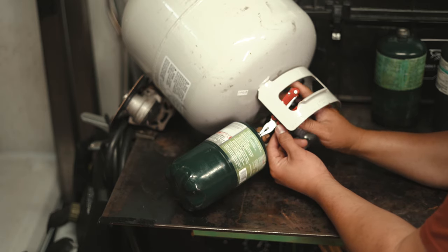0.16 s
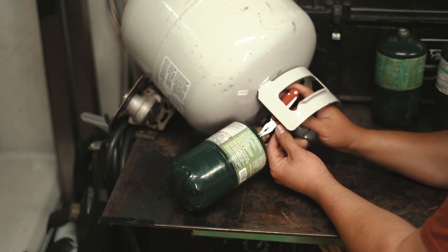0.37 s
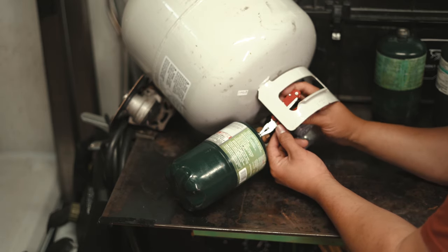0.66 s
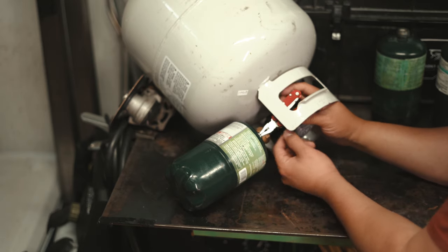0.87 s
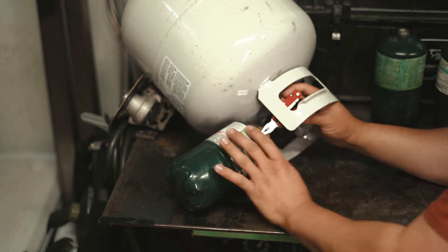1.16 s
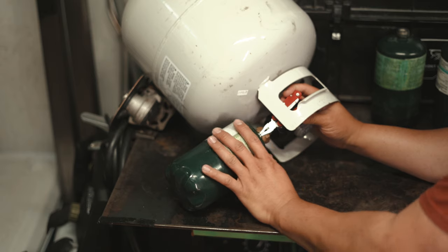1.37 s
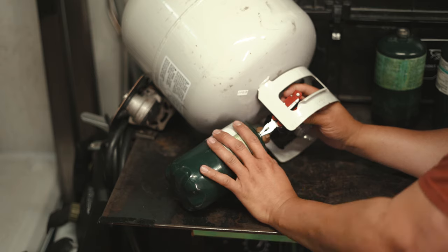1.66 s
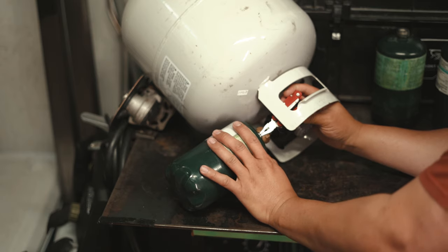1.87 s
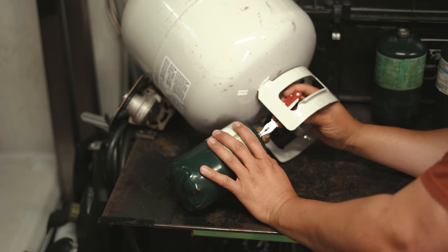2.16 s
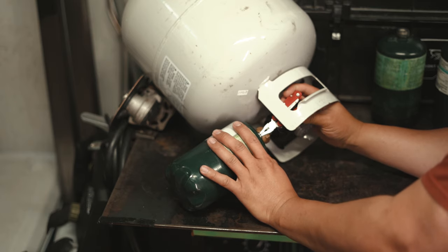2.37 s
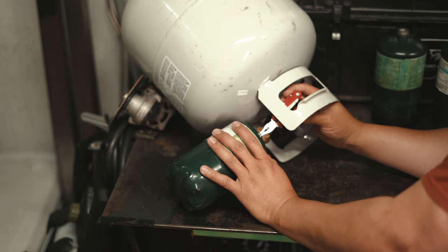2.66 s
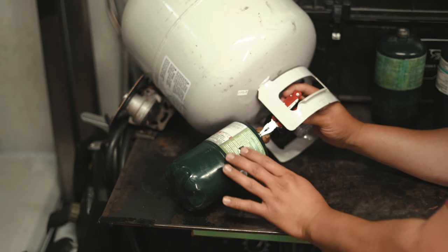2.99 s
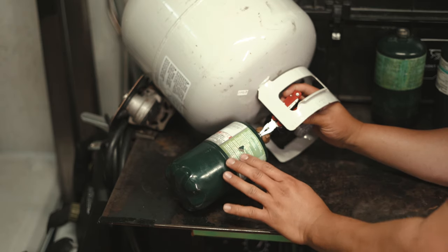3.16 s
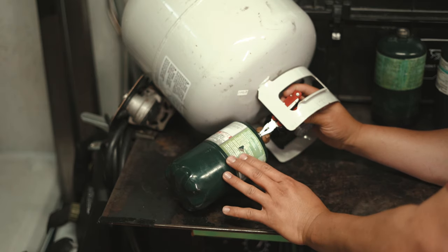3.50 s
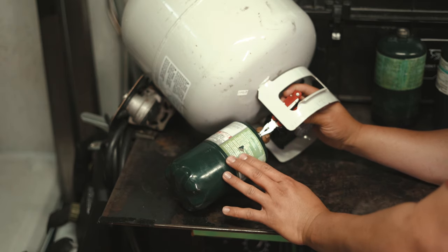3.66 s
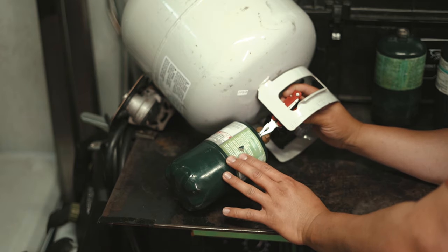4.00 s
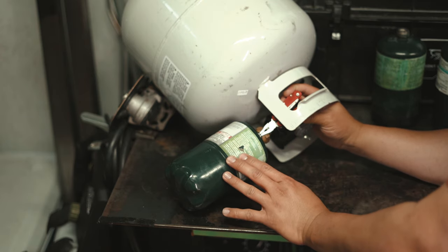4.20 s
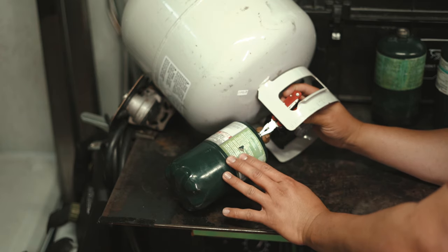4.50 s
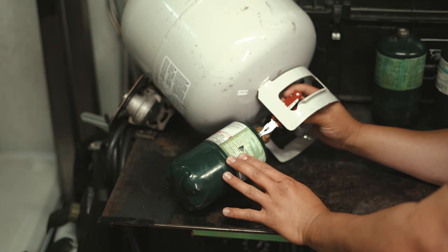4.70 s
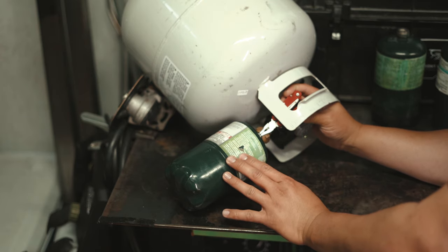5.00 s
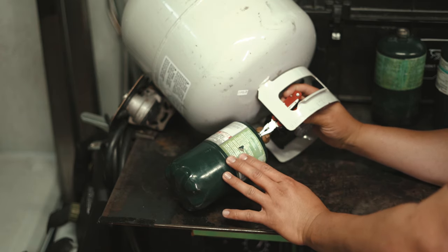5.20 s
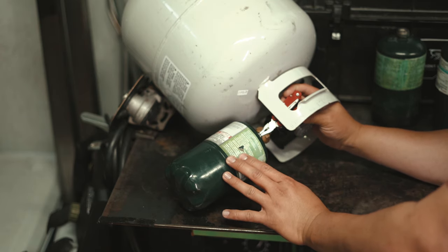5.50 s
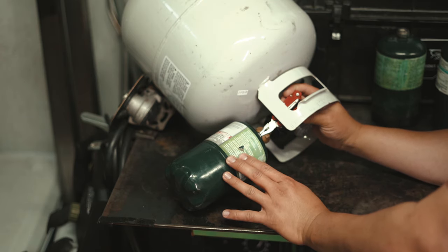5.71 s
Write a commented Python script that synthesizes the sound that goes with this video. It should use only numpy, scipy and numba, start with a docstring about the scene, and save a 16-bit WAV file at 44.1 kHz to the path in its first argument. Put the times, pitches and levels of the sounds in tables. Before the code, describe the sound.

A steady low fan rumble with faint room hiss fills a workshop, picked up closely by one microphone, identical in both channels. From 0 to 1.6 s hands make short, airy rubs on metal and small hard clicks, sharpest near 0.5, 1.0 and 1.2 s, with slight steel ringing; a very faint breathy tone and low bench rumble come in. At 1.7 s a falling breathy whistle cracks open into a loud, bright gas jet until 2.4 s. It drops to a thin leak that spits and crackles wetly, densest at 2.65-2.95 s. At 3.0 s there is a click, a rub and a soft ringing ping. More abrupt jets come at about 3.55-3.9, 4.15-4.7, 4.9-5.3 and 5.55-5.9 s, the last three swelling into rougher full blasts. Thin hissing leaks fill the gaps. The rumble ducks under each surge, held to a similar loudness, while a faint hollow hum grows.

```python
"""Filling a propane cylinder

A small cylinder is filled from a big tank on a workshop bench, over the steady rumble of a fan.
Hands rub and click at the fitting, made of short noise strokes, noise bursts and decaying sines.
Then gas vents as the valve is worked: filtered noise blends from a thin spitting leak to a loud jet
or a full blast, with a whistle as the seat cracks open and a hum that grows as the cylinder fills.
A limiter holds the jet down, so the rumble ducks under every surge.
"""
import sys
import numpy as np
from scipy import signal
from scipy.fft import rfft, irfft
from scipy.io import wavfile
from scipy.ndimage import uniform_filter1d
from numba import njit

SR = 44100
rng = np.random.default_rng(int(sys.argv[2]) if len(sys.argv) > 2 else 0)


def bounce(signal):
    """Save signal as a 16-bit WAV file at the path given by the first command-line argument."""
    frames = np.transpose(np.atleast_2d(signal))
    limited = np.clip(frames, -1, 1)
    pcm = np.round(limited * 32767).astype(np.int16)
    wavfile.write(sys.argv[1], SR, pcm)


N = 257984
TIME = np.arange(N) / SR
HZ = np.maximum(np.arange(N // 2 + 1) * SR / N, 1)  # frequency of each spectrum bin
TOP_HZ = 15750  # the final treble cut

# Spectrum of the room noise. Each row: frequency in Hz, relative level in dB.
ROOM_COLOUR = [(20, -34), (40, -2), (75, -0.5), (150, -7.5), (200, -8.5), (300, -16.5), (400, -16),
               (900, -15), (1500, -18.5), (2500, -26), (5000, -31.5), (10000, -32.5), (15000, -26)]
# Fan and room resonances. Each row: centre in Hz, width in Hz, lift in dB.
FAN_RESONANCES = [(76, 5.8, 1.5), (106.6, 11, 9), (148.8, 10, 10.5), (367.4, 26, 6.5), (664.51, 22, 8)]

# Hands slide on the metal. Each row: middle in seconds, reach either side (down 17 dB) in seconds,
# level in dB, centre in Hz.
RUBS = [(.005, 0.056, -41, 4440), (0.138, 0.043, -46.5, 4000), (0.434, 0.02239, -43, 4500),
        (0.603, 0.018, -36, 6760), (0.627, 0.12, -44.5, 6000), (0.927, 0.054, -33, 7450),
        (1.25, 0.08754, -40, 10000), (1.339, 0.054, -37.5, 8609), (1.437, 0.089, -38, 7350),
        (1.572, .02, -44.5, 3980), (3.014, 0.076, -26, 10000)]
# Metal clicks at the fitting. Each row: start in seconds, approximate peak of the contact in dB,
# centre in Hz, nominal width in Hz, ring relative to the contact in dB.
CLICKS = [(0.421, -25.5, 4000, 4000, -22), (.525, -8, 11300, 14260, -35), (0.8136, -19, 5100, 7000, -22.5),
          (.999, -19, 4474, 7000, -30), (1.0049, -5.5, 6400, 2681, -25.5), (1.147, -26, 4500, 6000, -26),
          (1.194, -6, 6700, 11000, -27), (1.419, -21, 9000, 6000, -46), (3.006, -13, 9000, 10000, -24)]
# Ring of the steel cylinder. Each row: frequency in Hz, relative level in dB, 60 dB decay in seconds.
STEEL_MODES = [(850, -9.5, 0.17), (1881.1, -3.5, 0.32), (1976, -8, .15), (3400, 4, 0.057),
               (3715.3, -3.5, 0.0967), (6120, -5, 0.0668), (6834, -5, 0.14), (7250, 3, 0.06)]

# A faint sing at the tank valve; rise and fall are seconds per 20 dB.
SING_S, SING_RISE_S, SING_FALL_S, SING_DB = 1.3, 0.6, 0.8, -47.5
# The bench rumbles as a hand bears down on the cylinder.
LEAN_FROM_S, LEAN_TO_S, LEAN_HZ, LEAN_DB = 1.32, 1.78, 74.5, -40.5

# The seat cracks open with a falling breathy whistle.
CRACK_S, CRACK_LENGTH_S, CRACK_DB = 1.696, 0.06, -34.5
# Where the two whistle bands settle: lower and upper frequency in Hz.
CRACK_HZ = (5800, 9300)
CRACK_SHARP, CRACK_GLIDE_S = 0.15, 0.022  # share by which they start higher; time constant of the glide

# The valve is pressed open. Each row: open in seconds, let go in seconds, jet on opening in dB,
# rise in dB per second, fall in dB per second.
SURGES = [(1.784, 2.379, -1, 703, 305), (3.563, 3.879, -1.5, 230, 382), (4.153, 4.667, -1.5, 560, 125),
          (4.915, 5.266, 1, 276, 400), (5.537, 5.9, 2, 377, 400)]
ARCH_DB, ARCH_POWER = 5.5, 0.82  # the flow swells mid-press; a low power flattens the arch
SAG_DB = 4.5  # the pressure sags over the length of a press
TAIL_DB, TAIL_DB_PER_S = -19, 110  # the fitting empties: level below the end of the press, decay rate
# The leak in the pauses between presses. Each row: level in dB just after letting go,
# level in dB just before the next press.
LEAKS = [(-26, -22.5), (-28.5, -20.5), (-24.5, -26), (-26.5, -22)]
CREEP_POWER = 4.1  # the leak moves to its next level late in each pause, mostly upward
SEEP_DB = -11.5  # a little of the jet always sounds in the leak
# The valve goes fully open inside a surge. Each row: middle in seconds, half length in seconds,
# extra flow in dB.
BLASTS = [(4.293, 0.1, 6), (5.091, 0.094, 2), (5.682, 0.089, 4)]
# Colour of the turbulence. Each row: frequency in Hz, relative levels of leak, jet and blast in dB.
GAS_COLOUR = [(195, -6.5, -36, -33.5), (418.8, -7, -23, -22), (820.3, -10, -17.5, -16.5),
              (1483.4, -7.5, -20, -14.5), (3180, -4, -9.5, -10.5), (3800, -12.5, -2, -7.5),
              (4800, -2.5, -3.5, -15), (6840, -5, -0.5, -5.5), (8680, 3, -8, -10), (9800, -13, -9.5, -12),
              (11700, -10, -9.5, -13.5), (12740, -8, -11, -23), (14550, 5.5, 0, -3), (16200, -6, -6, -5.5)]
# Resonances of valve and cylinder. Each row: centre in Hz, width in Hz, lift in dB.
CAVITIES = [(1270, 140, 2), (1879, 70, 4.5), (3585, 37, 7), (3861.9, 24, 4.5), (4315, 6.1, 9.5),
            (4495, 140, 5), (4440, 280, 2), (4787, 61, 8.5), (4840, 89, 8.5), (5011, 136, 12.5),
            (5126, 77, 6.5), (5465.7, 220, 9.5), (5865, 240, 9.5), (6120, 152, 8.5), (6776, 34, 10.5),
            (8630, 110, 2), (9214, 222.0, 2), (12090, 148.0, 9.5), (9343, 150, 1.5), (11000, 110, 4),
            (13080, 120, 10), (14324, 250, 3.5)]
# Peaks and notches of the nearly closed passage. Each row: centre in Hz, width in Hz, lift in dB.
THROAT = [(1280, 270, 5), (4250, 109, -10), (4820, 307.7, -14), (5430, 120, 14), (6180, 285, 0.5),
          (7300, 220, -4), (8450, 88.7, -2), (7670, 59, -2.5), (8820, 250, -26), (9000, 115, 7),
          (12650, 120, 19), (13370, 150, -2), (13670, 85, -3.5), (15190, 175, 3), (14900, 280, -6),
          (14800, 200, 6.5)]
# The passage before the grip shifts. Each row: centre in Hz, width in Hz, lift in dB.
FIRST_GRIP = [(3670, 350, -1.5), (4400, 300, 5.5), (4840, 388.5, -6.5), (5600, 220, -2.5), (6350, 260, 6),
              (6780, 700, -4.5), (9380, 270, 7), (12800, 1424, -1), (16000, 790, -10)]
# The passage in the later surges. Each row: centre in Hz, width in Hz, lift in dB.
LATER_GRIP = [(4072.4, 230, 3), (5430, 220, -5), (7840, 510, 3.5), (8710, 300, -7), (8813.5, 210, 7),
              (13300, 300, 6.5), (15200, 300, -14)]
GRIP_SHIFT_S = 2.6

# Spells when liquid reaches the leak. Each row: start in seconds, end in seconds, strength in dB,
# rise in seconds per 20 dB, fall in seconds per 20 dB.
WET_SPELLS = [(2.424, 2.443, 2, 0.55, 0.2), (2.637, 2.9, 1.5, 0.2, 0.12)]
# The largest drops spit through the leak. Each row: start in seconds, approximate peak in dB.
SPITS = [(2.444, -4.5), (2.646, -8), (2.661, -6), (2.684, -8), (2.706, -7), (2.729, -3.5), (2.754, -5),
         (2.850, -3.5), (2.878, -10), (2.921, -9), (2.956, -9)]
# Levels ahead of the wet-spell gain: low sputter, extra hiss of the boiling liquid, small drops (peak).
SPUTTER_DB, WET_JET_DB, DROPLET_DB = -35, -29.5, -17
DROPLETS_PER_S = 37

# A finger sets the cylinder wall singing. The row: peak in seconds, reach of the swell (from 17 dB
# down) in seconds, frequency in Hz, level in dB.
WALL_PING = (3.035, .04, 1868, -35)
# The gas inside the cylinder hums as it fills. Each row: frequency in Hz, width in Hz, relative level in dB.
HOLLOW_MODES = [(366, 12, -2.5), (1235, 40, -1), (1288.6, 40, -5)]
HUM_FULL_S, HUM_RISE_S, HUM_DB = 5.13, 1.0, -38  # the rise is seconds per 20 dB


def undb(db):
    """Decibels to gain."""
    return 10 ** (np.asarray(db) / 20)


def unit(x):
    """Scale to rms 1."""
    return x / np.sqrt(np.mean(x ** 2))


def slope(hz, db):
    """Spectrum in dB drawn through a few points, straight over log frequency."""
    return np.interp(np.log(HZ), np.log(hz), db)


def bumps(table):
    """Resonances as bell-shaped lifts or dips in dB."""
    return sum(db / (1 + (2 * (HZ - hz) / width) ** 2) for hz, width, db in table)


def band(hz, width):
    """One broad resonance in dB, 0 at its centre."""
    return -10 * np.log10(1 + ((HZ ** 2 - hz ** 2) / (HZ * width)) ** 2)


def colour(x, db):
    """Filter with the given dB response, made minimum-phase by folding its cepstrum."""
    cepstrum = irfft(np.log(undb(db)), N)
    cepstrum[1:N // 2] *= 2
    cepstrum[N // 2 + 1:] = 0
    response = np.exp(rfft(cepstrum))
    return irfft(rfft(x) * response, N)


def walk(rate):
    """Smooth random wander of rms 1: levels held for 1 / rate seconds, then averaged twice."""
    hold = max(int(SR / rate), 1)
    steps = np.repeat(rng.standard_normal(N // hold + 1), hold)
    smooth = uniform_filter1d(uniform_filter1d(steps, hold), hold)
    return unit(smooth[:N])


def fade(s, t60):
    """Exponential decay that starts at time s and loses 60 dB in t60 seconds."""
    return (TIME >= s) * undb(-60 * np.clip((TIME - s) / t60, 0, 4))


def swell(start, end, rise, fall):
    """Gain 1 from start to end; rise and fall are the seconds that each 20 dB takes on either side."""
    before = np.maximum(start - TIME, 0) / rise
    after = np.maximum(TIME - end, 0) / fall
    return 10 ** -np.minimum(before + after, 12)


def turbulence(db, grain_db, grain_rate):
    """Noise that comes in quick eddies, through a filter."""
    eddies = rng.standard_normal(N) * undb(grain_db * walk(grain_rate))
    return unit(colour(eddies, db))


def snap(s, db, t60, tail_db, tail_t60):
    """A very short burst and its scatter off bench and tank; peak near 1."""
    push = fade(s, t60)
    push_rms = np.sqrt(np.mean(push ** 2))
    burst = unit(colour(rng.standard_normal(N) * push, db)) * push_rms / 2
    tail = unit(colour(rng.standard_normal(N), db)) * fade(s, tail_t60)
    return burst + undb(tail_db) * tail


def room():
    """Steady fan rumble with resonant peaks and a faint hiss above it."""
    room_db = slope(*np.transpose(ROOM_COLOUR)) + bumps(FAN_RESONANCES)
    return undb(-36) * turbulence(room_db, grain_db=-1.37, grain_rate=12)


def rubs():
    """Skin drags over the metal in short strokes that catch and slip."""
    out = 0
    for s, reach, db, hz in RUBS:
        stroke = np.exp(-2 * ((TIME - s) / reach) ** 2)
        catch = undb(2.5 * walk(70))
        scrape = turbulence(band(hz, 1.8 * hz), grain_db=1.0, grain_rate=760)
        out = out + undb(db) * stroke * catch * scrape
    return out


def clicks():
    """Hard little contacts, each of which sets the modes of the steel cylinder ringing."""
    out = 0
    for s, db, hz, width, ring_db in CLICKS:
        ring = 0
        for mode_hz, mode_db, t60 in STEEL_MODES:
            ring = ring + undb(mode_db) * fade(s, t60) * np.sin(2 * np.pi * mode_hz * (TIME - s))
        contact_db = 2 * band(hz, width)  # doubled for steeper skirts
        contact = snap(s, contact_db, t60=0.005, tail_db=-25, tail_t60=0.15)
        out = out + undb(db) * (contact + undb(ring_db) * ring)
    return out


def sing():
    """A thin breathy tone at the tank valve: narrow-band noise that swells and fades."""
    tone = turbulence(band(2840, 170), grain_db=1.2, grain_rate=40)
    return tone * undb(SING_DB) * swell(SING_S, SING_S, SING_RISE_S, SING_FALL_S)


def lean():
    """A low rumble of the bench under the weight of the hand."""
    rumble = turbulence(2 * band(LEAN_HZ, 84), grain_db=1.5, grain_rate=22)
    return rumble * undb(LEAN_DB) * swell(LEAN_FROM_S, LEAN_TO_S, rise=0.25, fall=0.1)


def crack():
    """Two breathy bands slide down in a first puff as the gap at the seat widens."""
    glide = 1 + CRACK_SHARP * np.exp(-np.maximum(TIME - CRACK_S, 0) / CRACK_GLIDE_S)
    whistle = 0
    for hz in CRACK_HZ:
        phase = 2 * np.pi * np.cumsum(hz * glide) / SR
        whistle = whistle + walk(1700) * np.sin(phase)  # the random level makes the tone a noise band
    puff = turbulence(band(7960, 5000), grain_db=0, grain_rate=500)
    breath = unit(unit(whistle) + undb(-6) * puff)
    return breath * undb(CRACK_DB) * swell(CRACK_S, CRACK_S + CRACK_LENGTH_S, rise=0.01, fall=0.02)


def surges():
    """Gain of the jet: each press opens, arches, sags and closes, and the fitting empties after it."""
    jet = 0
    for start, end, db, rise, fall in SURGES:
        early = np.maximum(start - TIME, 0)
        late = np.maximum(TIME - end, 0)
        through = np.clip((TIME - start) / (end - start), 0, 1)
        arch_db = ARCH_DB * np.abs(np.sin(np.pi * through)) ** ARCH_POWER
        held_db = db + arch_db - SAG_DB * through
        closing_db = np.maximum(-fall * late, TAIL_DB - TAIL_DB_PER_S * late)
        jet = jet + undb(held_db - rise * early + closing_db)
    return jet


def leaking():
    """Gain of the leak: it starts with the first press and moves late in every pause to its next level."""
    starts, ends, _, rises, _ = np.transpose(SURGES)
    edges = np.column_stack([ends[:-1], starts[1:]]).ravel()  # start and end of each pause
    creep = np.interp(TIME, edges, np.arange(len(edges)) % 2) ** CREEP_POWER
    after_db, before_db = (np.interp(TIME, edges, np.repeat(db, 2)) for db in np.transpose(LEAKS))
    leak_db = after_db + creep * (before_db - after_db)
    return undb(leak_db - rises[0] * np.maximum(starts[0] - TIME, 0))


def wetness():
    """How much liquid is in the leak, as a gain."""
    return sum(undb(db) * swell(start, end, rise, fall) for start, end, db, rise, fall in WET_SPELLS)


def valve():
    """Gains of leak and jet, and the share of the jet that is a full blast."""
    jet, leak, share = surges(), leaking(), 0
    for s, half_length, db in BLASTS:
        wide = np.exp(-((TIME - s) / half_length) ** 4)  # flat-topped opening
        jet = jet * undb(db * wide)
        share = share + wide
    jet = jet + undb(SEEP_DB) * leak + undb(WET_JET_DB) * wetness()
    return leak, jet, np.minimum(share, 1)


def gas():
    """The opening blends leak, jet and blast; each rings the cavities it passes, and the flow flutters."""
    leak_gain, jet_gain, share = valve()
    hz, *shapes = np.transpose(GAS_COLOUR)
    leak_db, jet_db, blast_db = (slope(hz, shape) for shape in shapes)
    first_db = bumps(CAVITIES + FIRST_GRIP)
    later_db = bumps(CAVITIES + LATER_GRIP)
    leak = turbulence(leak_db + bumps(THROAT), grain_db=0.2, grain_rate=760)
    first = turbulence(jet_db + first_db, grain_db=0.7, grain_rate=730)
    later = turbulence(jet_db + later_db, grain_db=1.03, grain_rate=800)
    blast = turbulence(blast_db + later_db, grain_db=1.15, grain_rate=580)
    plain_jet = np.where(TIME < GRIP_SHIFT_S, first, later)
    jet = np.sqrt(1 - share) * plain_jet + np.sqrt(share) * blast  # equal-power blend
    flutter = undb(0.5 * walk(45))
    return (leak_gain * leak + jet_gain * jet) * flutter


def bench(x, echo_db, t60):
    """Close reflections off bench, tank and walls ripple the spectrum finely."""
    echoes = rng.standard_normal(N) * fade(0.0035, t60)
    echoes *= undb(echo_db) / np.sqrt(np.sum(echoes ** 2))
    wet = signal.fftconvolve(x, echoes)[:N]
    return (x + wet) / np.sqrt(1 + undb(echo_db) ** 2)


def spits():
    """Each drop bursts in the nozzle and rings its main resonance; small ones sputter lower down."""
    nozzle_db = band(5600, 1400) + bumps([(1420, 3800, 12)])
    drops = 0
    for s, db in SPITS:
        drops = drops + undb(db) * snap(s, nozzle_db, t60=0.005, tail_db=-16, tail_t60=0.06)
    sputter_db = band(560, 2200) + bumps([(230, 80, 4.7), (484, 49, 13)])
    sputter = turbulence(sputter_db, grain_db=4.5, grain_rate=160)
    kicks = (rng.random(N) < DROPLETS_PER_S / SR) * rng.standard_normal(N)
    droplets = colour(kicks, nozzle_db)
    droplets *= undb(DROPLET_DB) / np.max(np.abs(droplets))
    return drops + (undb(SPUTTER_DB) * sputter + droplets) * wetness()


def wall_ping():
    """One mode of the cylinder wall swells under a sliding finger, then rings out."""
    s, reach, hz, db = WALL_PING
    rising = np.exp(-2 * ((TIME - s) / reach) ** 2)
    shape = np.where(TIME < s, rising, fade(s, 0.55))
    return undb(db) * shape * np.sin(2 * np.pi * hz * TIME)


def hum():
    """The flow stirs the narrow resonances of the cylinder's hollow, more as it fills."""
    modes = 0
    for hz, width, db in HOLLOW_MODES:
        modes = modes + undb(db) * walk(2 * width) * np.sin(2 * np.pi * hz * TIME)
    return unit(modes) * undb(HUM_DB) * swell(HUM_FULL_S, TIME[-1], HUM_RISE_S, 1)


def scene():
    """Everything reaches one microphone, the same in both channels."""
    venting = bench(gas() + crack(), echo_db=-8.5, t60=0.095) + hum() + sing() + spits()
    handling = clicks() + rubs() + wall_ping() + lean()
    mono = venting + handling + room()
    return np.array([mono, mono])


@njit
def follow(x, attack, release):
    """Envelope that rises and falls at its own rates."""
    out, level = np.empty(len(x)), 0.
    for i in range(len(x)):
        level += (x[i] - level) * (attack if x[i] > level else release)
        out[i] = level
    return out


def limiter(x, ceiling_db, attack_s, release_s, ratio):
    """Soft-knee gain reduction driven by the short-time rms of the sound."""
    rms = np.sqrt(np.abs(uniform_filter1d(x[0] ** 2, size=128)))
    envelope = follow(rms, 1 / (attack_s * SR), 1 / (release_s * SR))
    over = envelope / undb(ceiling_db)
    return x * (1 + over ** 2) ** (-(1 - 1 / ratio) / 2)


def record(dry):
    """A slow gain control eases the level down, the limiter holds the surges level, then the top is cut."""
    eased = limiter(dry, ceiling_db=-19.5, attack_s=0.42, release_s=2.2, ratio=1.132)
    held = limiter(eased, ceiling_db=-14.5, attack_s=0.003, release_s=0.014, ratio=30)
    top_cut = signal.ellip(12, 0.1, 80, TOP_HZ, fs=SR, output="sos")  # 0.1 dB ripple, 80 dB stopband
    return signal.sosfilt(top_cut, held)


dry = scene()
out = record(dry)
bounce(out)
```